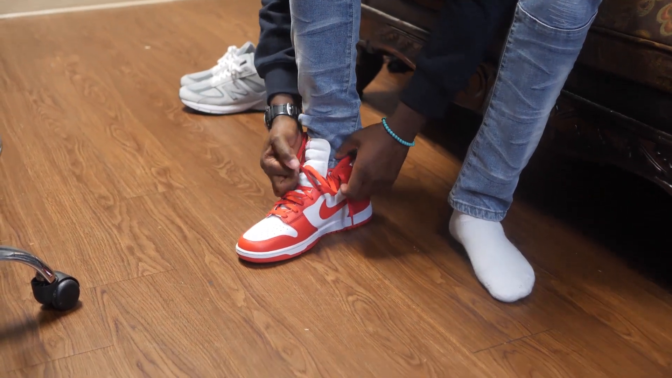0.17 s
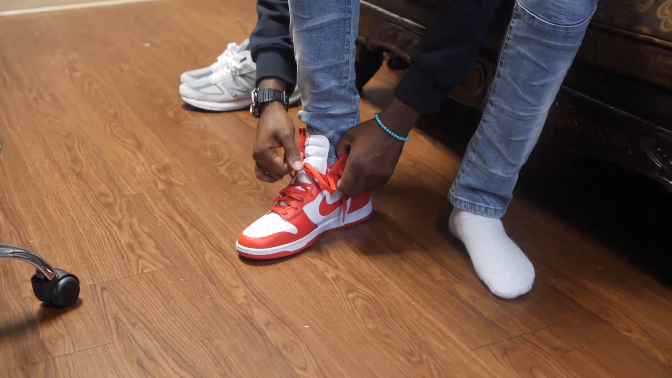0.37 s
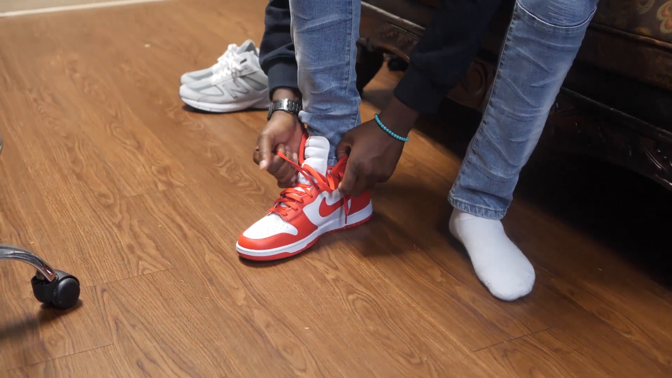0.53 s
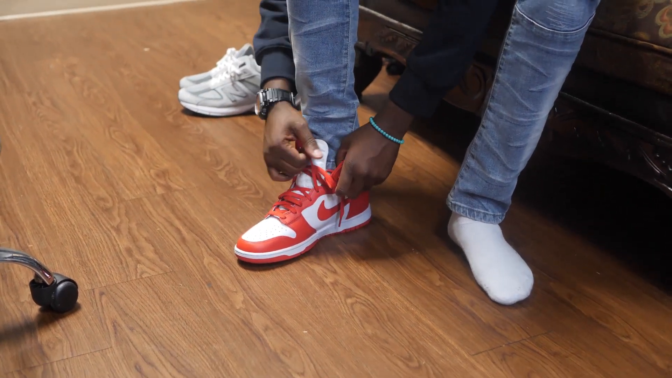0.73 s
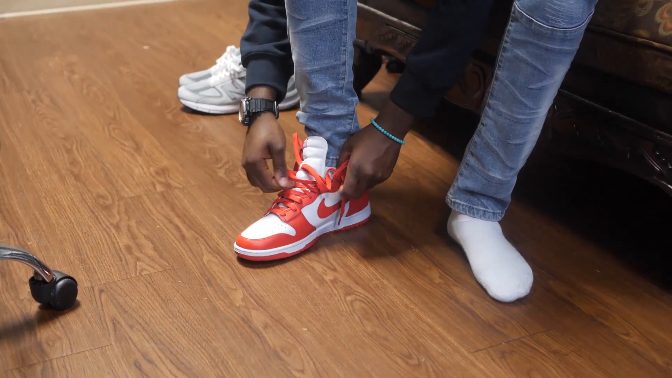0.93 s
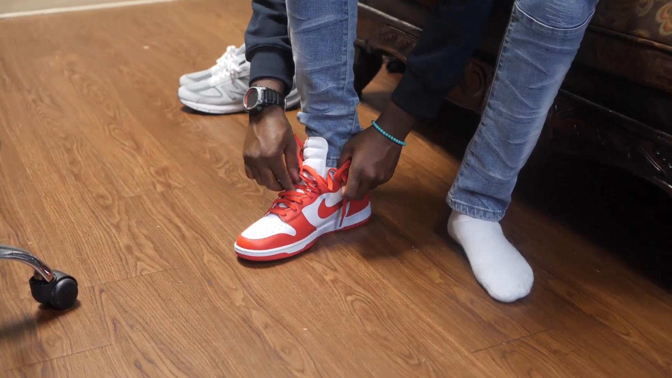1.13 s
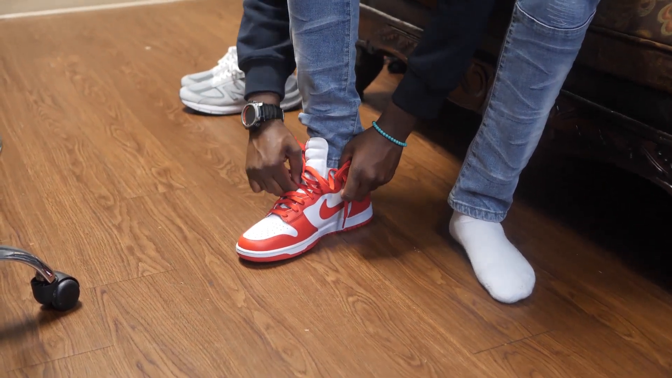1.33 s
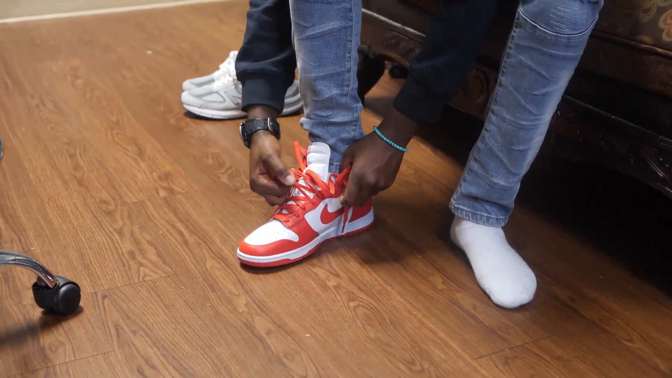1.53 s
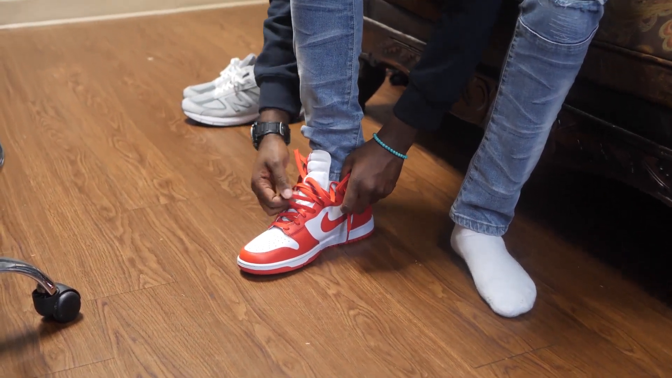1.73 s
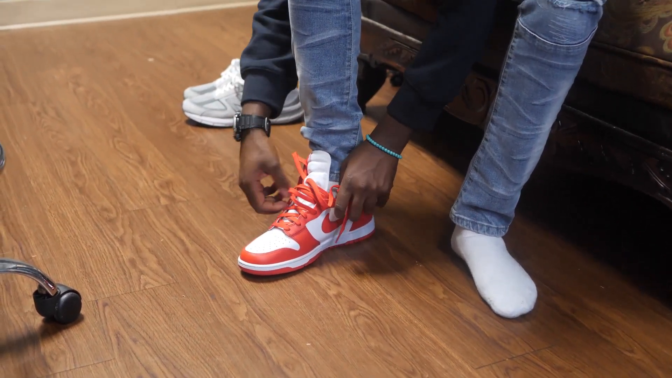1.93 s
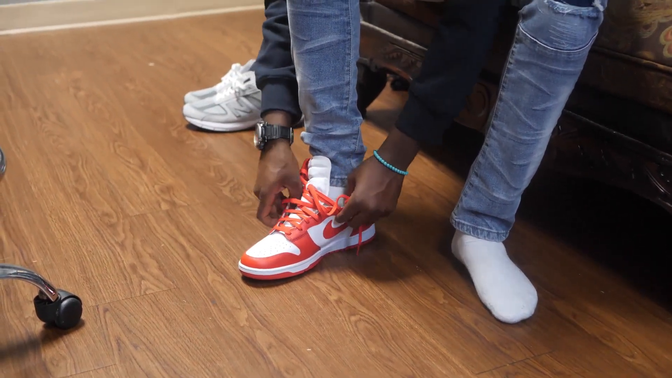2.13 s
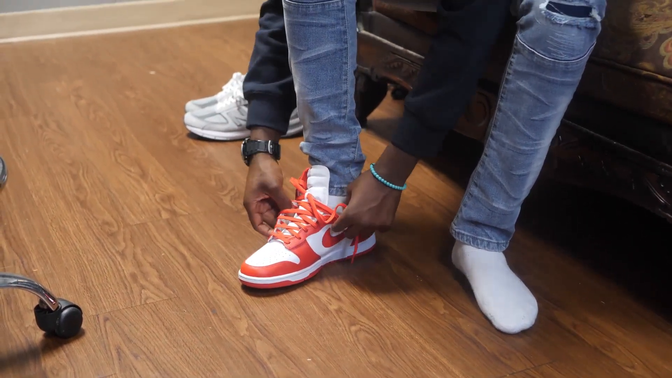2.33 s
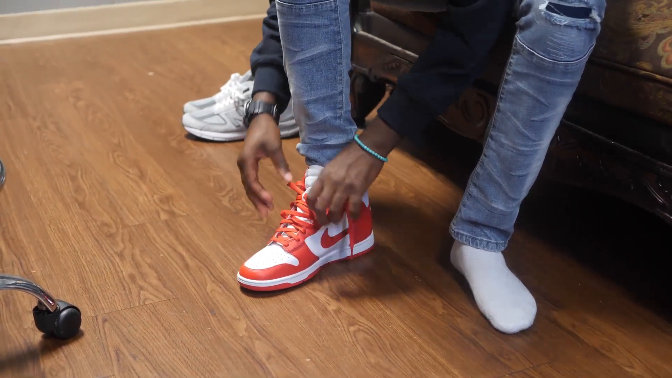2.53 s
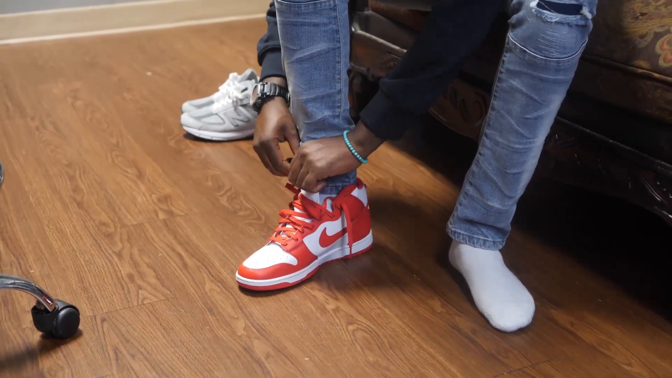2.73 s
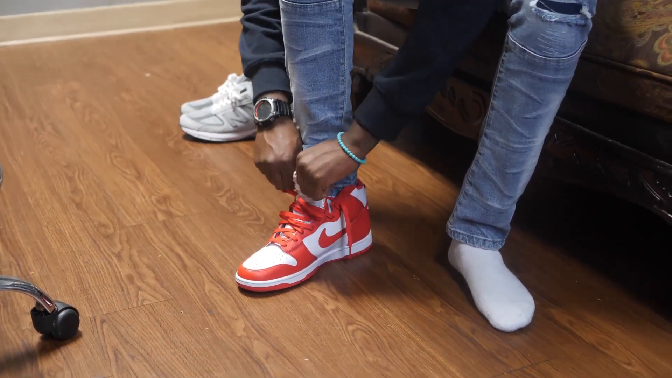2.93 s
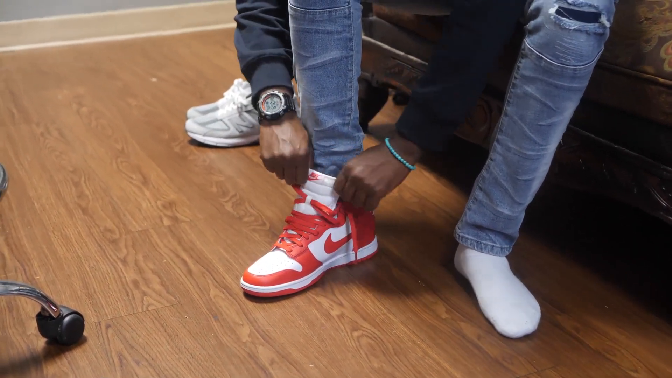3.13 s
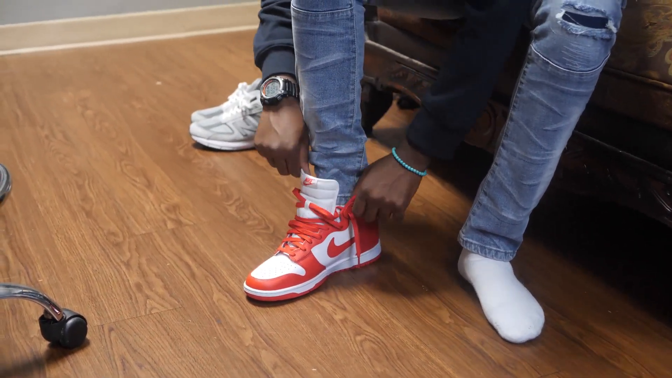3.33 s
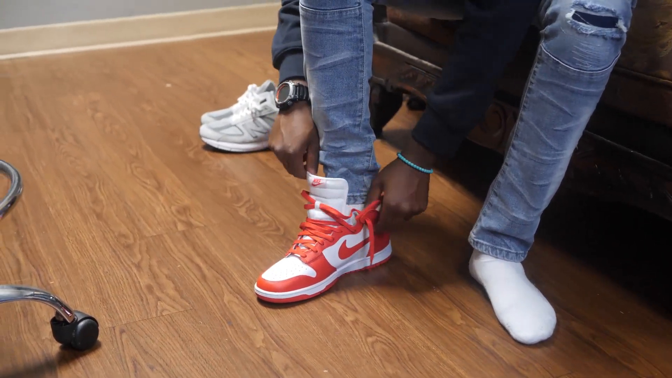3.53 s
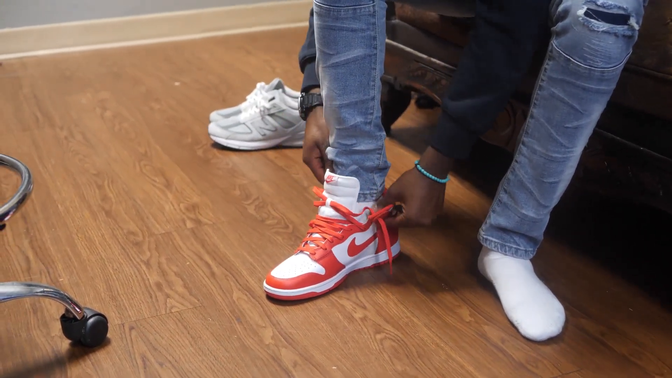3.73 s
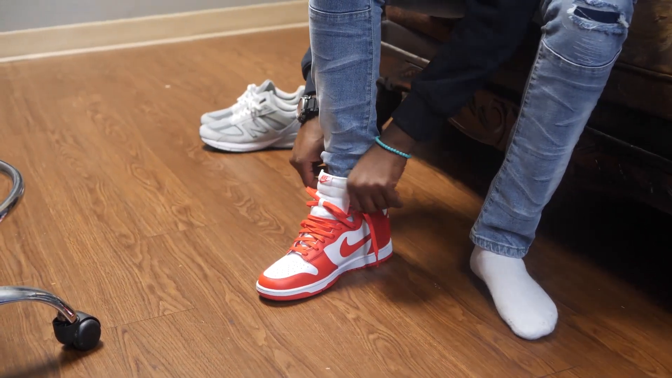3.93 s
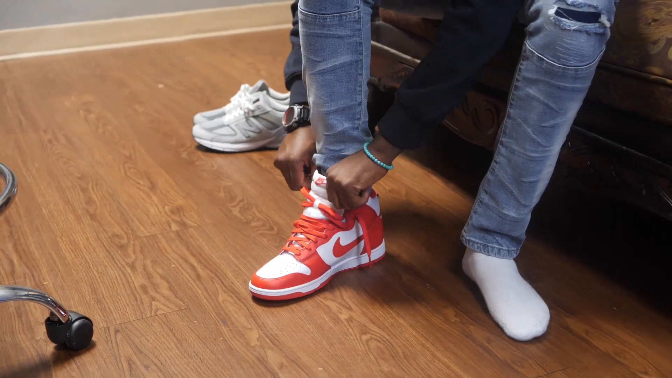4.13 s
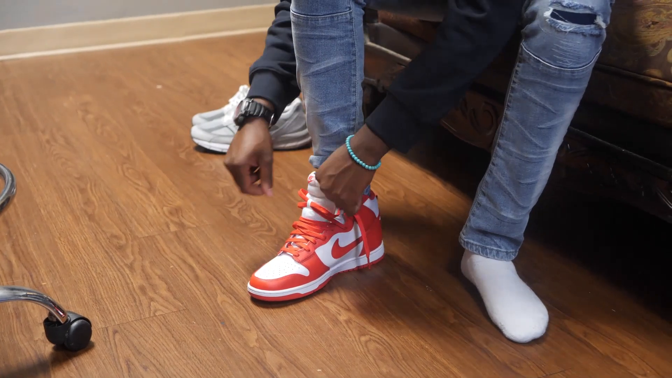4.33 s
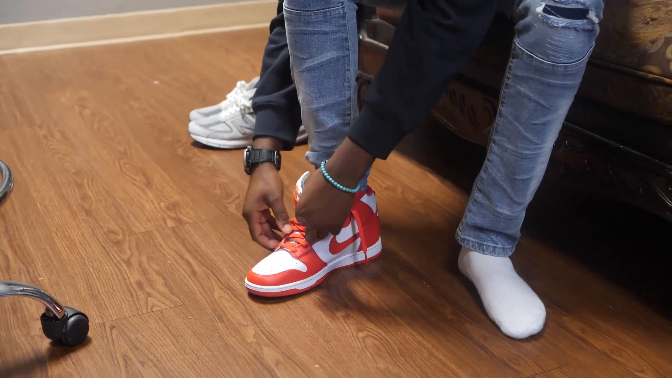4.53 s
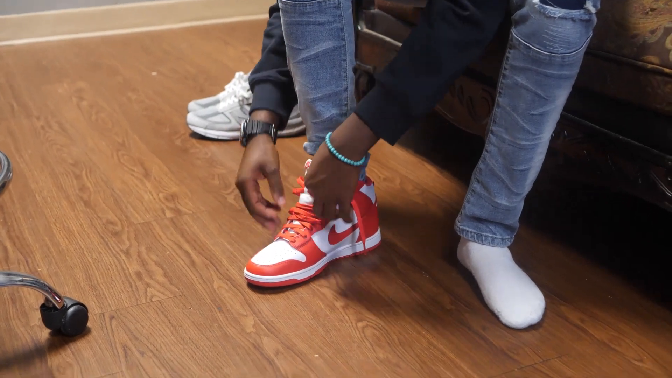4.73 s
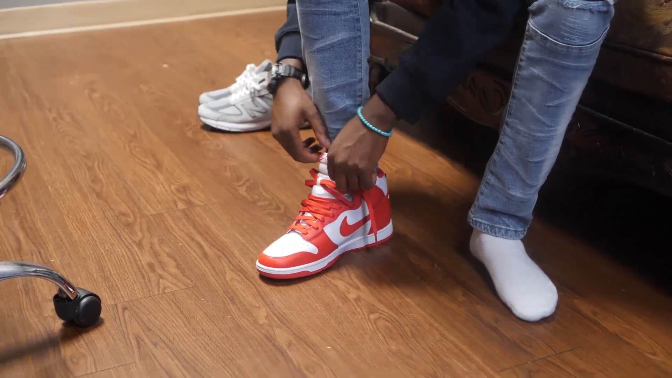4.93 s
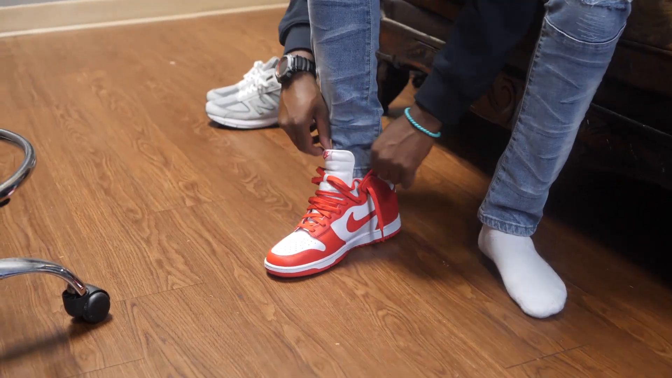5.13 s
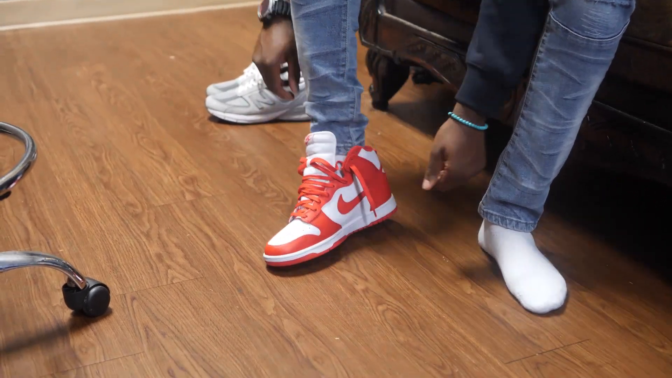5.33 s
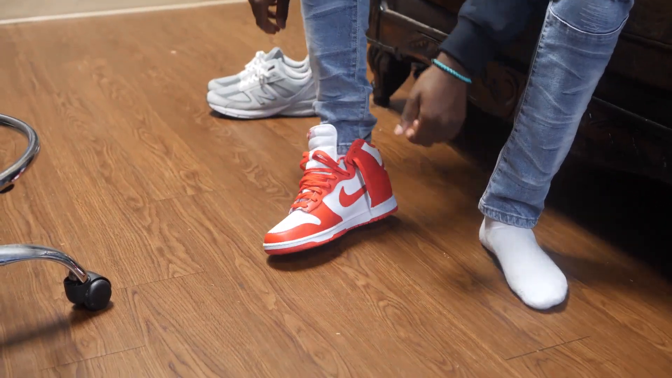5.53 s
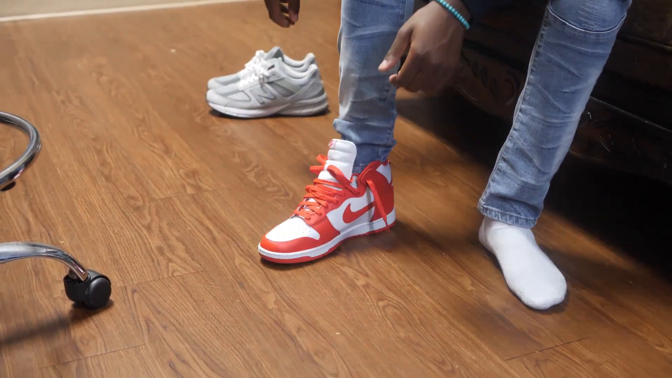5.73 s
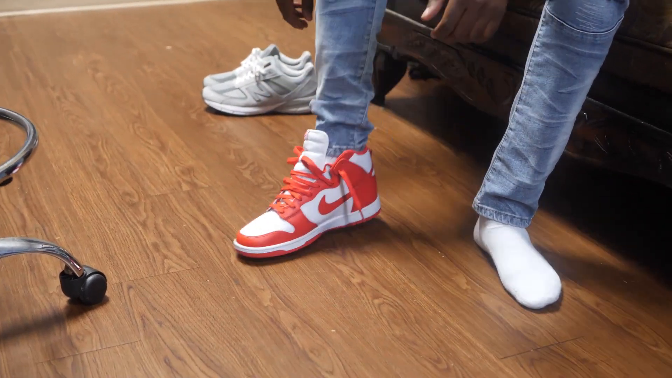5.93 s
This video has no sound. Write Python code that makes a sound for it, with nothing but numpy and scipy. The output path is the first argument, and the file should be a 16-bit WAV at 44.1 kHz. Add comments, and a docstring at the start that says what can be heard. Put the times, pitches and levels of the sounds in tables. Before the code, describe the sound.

Close, quiet lace pulling with dry rubbing and tiny leather taps, softer brushing, and finally two sharp sole knocks on floorboards.

```python
"""Shoe laces are pulled tight and tied in a small quiet room: random fibre slips rasp, hiss and shake the shoe.
A low resonance creaks as the lace tightens. Softer brushes follow, of fingers on knot, tongue and denim.
Fingers and lace ends tap the leather: short dead swings with a bright snap of noise.
Near the end, heel and sole knock twice on a wooden floor: thuds, clacks and grit set board tones ringing.
Faint room air and a low drone, both made of filtered noise, lie underneath."""
import sys
import numpy as np
from scipy import signal
from scipy.fft import rfft, irfft
from scipy.io import wavfile

SR = 44100
rng = np.random.default_rng(int(sys.argv[2]) if len(sys.argv) > 2 else 0)


def file_out(sig):
    """Save sig as 16-bit WAV at sys.argv[1]."""
    # one column per channel
    cols = np.atleast_2d(sig).T
    # limit, then scale
    lim = np.clip(cols, -1, 1)
    pcm = np.round(lim * 32767).astype(np.int16)
    wavfile.write(sys.argv[1], SR, pcm)


N = 268128
TIME = np.arange(N) / SR


def from_db(db):
    """Turn decibels into a gain."""
    return 10 ** (np.asarray(db) / 20)


def rms_one(x):
    """Scale a sound to an average (rms) level of 1."""
    return x / np.sqrt(np.mean(x ** 2) + 1e-20)


def fade(t, t60):
    """Natural dying away: the level falls by 60 dB over each t60."""
    return np.exp(-np.log(1000) * t / t60)


def at_hz(points, hz):
    """Read a table between its points, with pitch on a logarithmic axis."""
    table_hz, value = np.transpose(points)
    return np.interp(np.log(np.maximum(hz, 1)), np.log(table_hz), value)


def coloured(x, spectrum):
    """Strengthen or weaken each pitch by the level in a (pitch_hz, level_db) table."""
    size = x.shape[-1]
    gain = from_db(at_hz(spectrum, np.fft.rfftfreq(size, 1 / SR)))
    return irfft(rfft(x) * gain, size)


def cut(x, hz, kind, order=2):
    """Keep the lows, the highs or a band, filtering forward in time only."""
    edge_hz = np.clip(hz, 10, .45 * SR)
    return signal.sosfilt(signal.butter(order, edge_hz, kind, fs=SR, output="sos"), x)


def spread(mid, side):
    """Two close microphones hear a shared sound plus a side sound of opposite sign, weakest in the bass."""
    # how strong the side sound is: pitch_hz [Hz], side_minus_mid_db [dB]
    stereo_width = [(60, -26), (125, -51), (250, -30.5), (500, -18.5), (1000, -8), (4000, -7.5),
                    (8000, -24), (13000, -7.5)]
    return mid + coloured(side, stereo_width) * np.array([[1], [-1]])


def drift(rate_hz):
    """Random wavering slower than the given rate, with spread 1."""
    noise = rng.standard_normal(N + SR)
    return rms_one(cut(noise, rate_hz, "low")[SR:])  # the first second lets the filter settle


def ring(x, hz, t60):
    """Each unit click sets a sine of about height 1 ringing and dying away."""
    r = from_db(-60 / (t60 * SR))  # loss per sample
    turn = 2 * np.pi * hz / SR
    return signal.lfilter([0, np.sin(turn)], [1, -2 * r * np.cos(turn), r * r], x + 1e-18)


def resonate(x, hz, width_hz):
    """A resonance picks out one pitch, with a gain of about 1 at its peak."""
    r = np.exp(-np.pi * width_hz / SR)
    top = np.array([1, 0, -1]) * (1 - r * r) / 2
    return signal.lfilter(top, [1, -2 * r * np.cos(2 * np.pi * hz / SR), r * r], x)


def blow(hz, cycles, rise_cycles=0.46):
    """A yielding contact: a swing of height 1 that builds quickly and is gone after a few cycles."""
    turns = hz * TIME[:SR // 3]
    build = 1 - np.exp(-turns / rise_cycles)
    swing = -np.sin(2 * np.pi * turns) * fade(turns, cycles) * build
    return swing / np.abs(swing).max()


def crack(t60):
    """A burst of dying noise: grit at a contact."""
    t = TIME[:SR // 3]
    return rng.standard_normal(len(t)) * fade(t, t60) / 2


def add(track, s, sound):
    """Mix a stereo sound in at a time in seconds."""
    start = round(s * SR)
    track[:, start:start + sound.shape[1]] += sound[:, :N - start]


def reflected(x):
    """Sofa, wall and ceiling each return one late copy, which combs the spectrum."""
    # first reflections: delay_s [s], level_db [dB]
    first_echoes = [(.0029, -39), (.0052, -22.5), (.0120, -8.5)]
    t = TIME[:len(x)]
    return x + sum(from_db(db) * np.interp(t - delay, t, x, left=0) for delay, db in first_echoes)


def room(x, wet_db, build_s=0.00069):
    """A short sound, its first reflections and dense random echoes that die at a different rate in each band."""
    # how long the echoes last: pitch_hz [Hz], t60_s [s]
    echo_times = [(100, 0.27), (260, 0.1951), (700, 0.17), (1840, 0.18), (4850, 0.23), (14000, 0.45)]
    # balance of the echoes before they are scaled: pitch_hz [Hz], level_db [dB]
    echo_colour = [(60, -28), (150, 3), (400, 2), (750, 4.5), (1300, 0.5), (2500, -5), (4500, 8.5),
                   (8000, -7.5), (15000, -6.5)]
    t = TIME[:len(x)]
    edges = np.geomspace(60, 16000, 9)
    white, tail = rng.standard_normal((2, 2, len(t))), 0
    for k, band in enumerate(zip(edges, edges[1:])):
        hz = np.sqrt(band[0] * band[1])
        dying = from_db(at_hz(echo_colour, hz)) * fade(t, at_hz(echo_times, hz))
        tail = tail + dying * cut(white[k % 2], band, "band")
    tail = spread(*tail) * (1 - np.exp(-t / build_s))
    tail /= np.sqrt(np.sum(tail ** 2) / 2)  # unit energy per channel on average
    echoes = signal.fftconvolve(x[None], tail, axes=1)[:, :len(x)]
    return reflected(x) + from_db(wet_db) * echoes


def swell(s, rise_s, fall_s, db):
    """Gain of a run of strokes: each speeds up and slows down, and overlapping ones add in power."""
    edge_loss_db, roundness = 9.5, 1.54  # loss at the end of rise or fall; top: 1 pointed, 2 bell-shaped
    coarse_time = TIME[::32]
    power = 1e-12
    for at, rise, fall, level in zip(s, rise_s, fall_s, db):
        away = np.maximum((at - coarse_time) / rise, (coarse_time - at) / fall)
        power = power + from_db(level - edge_loss_db * np.abs(away) ** roundness) ** 2
    return np.interp(TIME, coarse_time, np.sqrt(power))


def slips(per_s, size_db):
    """Fibres catch and let go at random: dense clicks of uneven size."""
    uneven = from_db(size_db * np.minimum(rng.exponential(1, (2, N)), 4))
    sizes = uneven * rng.standard_normal((2, N))
    mid, side = sizes * (rng.random((2, N)) < per_s / SR)
    return spread(reflected(mid), side)


def crinkles(per_s=130, cycles=35, low_hz=520, high_hz=2700, count=22):
    """Folds and strands snag at random, each snag ringing briefly at one of a set of pitches."""
    snags = rng.standard_normal(N) * (rng.random(N) < per_s / SR)
    dealt = rng.integers(0, count, N)  # which pitch each snag gets
    pitches = np.geomspace(low_hz, high_hz, count)
    return rms_one(sum(ring(snags * (dealt == k), hz, cycles / hz) for k, hz in enumerate(pitches)))


def rubbing(strokes, colour, modes, drag_trim_db, rasp_trim_db, hiss_trim_db,
            slips_per_s, size_db, judder_db, crinkle_db):
    """Slips shake the shoe, rasp on the weave and hiss; a stronger, faster stroke makes more of them."""
    # balance of the fibre hiss before it is scaled: pitch_hz [Hz], level_db [dB]
    hiss_colour = [(4500, -18), (6500, -12.5), (8000, -7.5), (9400, 1), (11000, -1.5), (12600, -2),
                   (14500, -9.5), (16000, -13)]
    s, rise, fall, level, drag_rel, rasp_rel = np.transpose(strokes)
    drag, rasp, hiss = (swell(s, rise, fall, level + rel) for rel in (drag_rel, rasp_rel, 0))
    speed = np.sqrt(np.maximum(hiss / from_db(level.mean()), .1))

    # dividing by sqrt(speed) evens out the loudness of denser slips
    even_slips = slips(slips_per_s * speed, size_db) / np.sqrt(speed)
    grains = rms_one(even_slips * from_db(judder_db * drift(51)))
    weave = grains + from_db(crinkle_db) * crinkles()
    resonances = sum(from_db(db) * resonate(weave, hz, width) for hz, width, db in modes)
    weave = coloured(weave + resonances, colour)

    shoe = rms_one(cut(cut(weave, 1507, "low", order=5), 157, "high", order=3))
    cord = rms_one(cut(weave, [1650, 5500], "band", order=4))
    fibres = rms_one(cut(coloured(grains, hiss_colour), 5200, "high", order=3))
    return (drag * from_db(drag_trim_db) * shoe + rasp * from_db(rasp_trim_db) * cord
            + hiss * from_db(hiss_trim_db) * fibres)


def background():
    """Faint room air is coloured noise; two resonances in a row turn noise into a low drone."""
    # balance of still air and microphone hiss before scaling: pitch_hz [Hz], level_db [dB per Hz]
    air_colour = [(15, -61), (25, -24), (97, -2.5), (130, 2.5), (195, 0.5), (293, 1.5), (354, -1.5),
                  (575, -3.5), (1100, -9), (1700, -9), (2000, -11.5), (5280, -18), (10700, -15),
                  (14400, -18), (16000, -30)]
    noise = spread(*rng.standard_normal((2, N)))
    air = from_db(-58) * rms_one(coloured(noise, air_colour))
    hum = resonate(resonate(rng.standard_normal(N), 115, 25), 115, 25)
    return air + from_db(-68) * rms_one(hum)


def steps():
    """The weight thuds into the boards, the rubber sole clacks flat on them and scuffs as it settles."""
    # heel and sole contacts, levels before echoes and filtering: start_s [s], thud_db [dB], thud_hz [Hz],
    # clack_db [dB], clack_hz [Hz], clack_cycles [cycles], grit_db [dB], grit_t60_s [s]
    contacts = [(5.7214, -9.5, 320, -15, 1440, 3.4, -10.5, 0.0097),
                (5.753, -11.5, 292, -14.5, 1860, 8.1, -34, .01),
                (5.763, -5, 734, -3.5, 2330, 5.5, -14.5, 0.055),
                (5.9527, -23.5, 408, -17, 1740, 4.8, -46, .012),
                (6.007, -8, 530, -9.5, 1980, 3.2, -12.5, 0.018),
                (6.0175, -11, 585, -2.5, 1170, 2.46, -42, .01)]
    # floorboard tones, levels relative to each other: pitch_hz [Hz], level_db [dB], t60_s [s]
    board_tones = [(182, 1, 0.15), (279, 0, 0.36), (323, 3, 0.15), (351, -2, 0.34), (434, -11, 0.27),
                   (491, 4, 0.073), (567, -18, 0.12), (698, 8, 0.25), (798, 9.5, 0.27), (900, 4, 0.24),
                   (2250, 16, 0.073), (2600, -1, 0.16)]
    out = np.zeros((2, N))
    for s, thud_db, thud_hz, clack_db, clack_hz, cycles, grit_db, grit_t60 in contacts:
        noise = crack(grit_t60)
        bright_grit = from_db(-13) * cut(noise, [7000, 12500], "band")
        grit = cut(noise, 1.86 * clack_hz, "low", order=4) + bright_grit
        thud = from_db(thud_db) * blow(thud_hz, cycles=1.92)
        clack = from_db(clack_db) * blow(clack_hz, cycles)
        contact = thud + clack + from_db(grit_db) * grit
        boards = 0
        for k, (hz, db, t60) in enumerate(board_tones):
            boards = boards + (-1) ** k * from_db(db) * ring(contact, hz, t60)  # signs alternate
        add(out, s, room(contact, wet_db=-1.5) + from_db(-60) * boards)
    return cut(out, 132, "high", order=5)


def taps():
    """Padded leather gives a dead pat; the lace adds a bright snap."""
    # lace and fingers on leather, levels before echoes and filtering:
    # start_s [s], level_db [dB], pitch_hz [Hz], snap_db [dB relative to the pat]
    pats = [(0.104, -34.5, 393, -9), (0.250, -36.5, 603, -8), (0.563, -36, 201, -5),
            (0.994, -38.5, 960, -5), (1.101, -48, 900, -2.5), (1.297, -40, 1140, -16),
            (1.667, -29, 590, -1.5), (1.6680, -32.5, 163, 5.5), (1.6700, -26.5, 900, -18),
            (2.168, -33, 784, -10), (2.217, -41, 181, -20), (2.289, -40, 650, -23), (3.192, -31, 770, -9),
            (3.417, -38.5, 640, -18), (3.870, -40, 830, -16), (4.5376, -37.5, 530, 0),
            (4.622, -36.5, 590, -16), (4.859, -43, 1870, -18), (4.890, -40, 1510, -18),
            (5.108, -28.5, 2030, -19)]
    out = np.zeros((2, N))
    for s, db, hz, snap_db in pats:
        snap = crack(t60=0.015)
        snap = snap - resonate(snap, hz=5350, width_hz=2600)  # hollow out the middle treble
        touch = blow(hz, cycles=4.95) + from_db(snap_db) * snap
        add(out, s, from_db(db) * room(touch, wet_db=-4.5))
    return cut(out, 217, "high", order=3)


def fingers():
    """Skin, lace loops and denim brush each other: fibre slips with no resonances of the taut upper."""
    # brushes on knot, tongue and denim, levels before the trims below: fastest_s [s], rise_s [s], fall_s [s],
    # hiss_db [dB], drag_db [dB relative to hiss], rasp_db [dB relative to hiss]
    brushes = [(2.680, 0.12, 0.14, -62.5, 2.5, 4), (2.810, 0.1, 0.099, -57, 0.5, -1.5),
               (2.925, 0.059, 0.091, -52.5, -1.5, 0.5), (3.060, 0.036, .04, -43.5, -2.5, -3),
               (3.140, 0.054, 0.093, -55, 4.5, -4), (3.265, 0.12, 0.097, -51.5, -2, -3),
               (3.450, 0.087, 0.14, -58.5, 0.5, -3), (3.580, 0.12, 0.058, -58, 2.5, 0),
               (3.710, 0.068, 0.039, -57, 0.5, -5.5), (3.840, 0.04, 0.044, -50.5, -9, -5.5),
               (3.970, 0.19, 0.19, -62.5, 0.5, 1), (4.135, 0.097, 0.052, -60, 0.5, 1.5),
               (4.245, 0.038, 0.058, -51, 1.5, -6.5), (4.338, 0.045, 0.023, -52.5, -4.5, -6),
               (4.460, 0.067, 0.24, -59.5, -4, -3), (4.553, 0.016, 0.035, -58.5, 12.5, 5),
               (4.640, 0.033, .055, -52.5, 5.5, -2.5), (4.785, 0.0071, 0.025, -57.5, -4, -1),
               (5.020, 0.085, 0.071, -51.5, 1.5, -1.5), (5.110, 0.023, 0.036, -50, 3.5, -3),
               (5.180, .05, 0.096, -57.5, 0.5, -2), (5.320, 0.13, 0.11, -61.5, 8, 4.5),
               (5.540, 0.11, 0.3, -59.5, 5.5, 2.5), (5.900, 0.032, 0.057, -57, -3, -1)]
    # balance of the handling sound before scaling: pitch_hz [Hz], level_db [dB per Hz]
    handling_colour = [(59, -27), (100, -2.5), (302, -5), (328, -7), (547, -3), (676, -1.5), (872, -4.5),
                       (1390, -5), (1720, -4.5), (3250, -13), (6020, -18), (9610, -16), (12900, -12),
                       (14700, -19), (16000, -29)]
    return rubbing(brushes, handling_colour, [], drag_trim_db=-0.35, rasp_trim_db=0.57, hiss_trim_db=-0.25,
                   slips_per_s=7000, size_db=-1.0, judder_db=0.76, crinkle_db=-18)


def creak(width_hz=70):
    """Stick and slip of the taut lace rings one low resonance whose pitch climbs as the lace tightens."""
    # creaks in the long pull: strongest_s [s], rise_s [s], fall_s [s], level_db [dB]
    catches = [(1.385, 0.019, 0.041, -43), (1.435, 0.039, .025, -44), (1.605, 0.042, 0.031, -57)]
    tighten_from_s, tighten_s = 1.35, .04
    slack_hz, taut_hz = 456, 644
    tension = 1 - np.exp(-np.maximum(TIME - tighten_from_s, 0) / tighten_s)
    hz = slack_hz + (taut_hz - slack_hz) * tension
    # slow complex noise, shifted up to the moving pitch
    sway = cut(rng.standard_normal(N) + 1j * rng.standard_normal(N), width_hz, "low")
    tone = np.real(sway * np.exp(2j * np.pi * np.cumsum(hz) / SR))
    return swell(*np.transpose(catches)) * rms_one(tone)


def laces():
    """Taut lace sliding through the eyelets makes the upper resonate."""
    # pulls through the eyelets, levels before the trims below: fastest_s [s], rise_s [s], fall_s [s],
    # hiss_db [dB], drag_db [dB relative to hiss], rasp_db [dB relative to hiss]
    pulls = [(0.020, 0.048, 0.026, -52.5, 0, -6), (0.110, 0.058, 0.081, -49.5, 2, -2),
             (0.250, .035, .05, -48, 1.5, -3), (0.340, 0.054, .13, -57.5, -3.5, -5.5),
             (0.520, 0.039, 0.036, -57.5, 7, -2), (0.572, 0.044, 0.038, -47, 4.5, -3),
             (0.720, 0.085, .12, -61, 5, -2), (0.940, 0.17, 0.13, -64, 5.5, -3),
             (1.108, 0.02, 0.029, -54, -7, -4.5), (1.218, 0.046, 0.044, -48.5, 4, 3.5),
             (1.308, 0.021, 0.04, -56.5, 11.5, 9.5), (1.405, 0.052, 0.11, -51, 0, -0.5),
             (1.500, 0.11, 0.083, -49.5, 2.5, -4.5), (1.600, 0.023, 0.051, -53, 7, -4.5),
             (1.674, 0.0099, 0.038, -54.5, 10.5, 3), (2.055, 0.067, 0.081, -59, 9, -0.5),
             (2.165, .065, .06, -48.5, 6.5, -3), (2.310, 0.081, .035, -60, 8, -0.5),
             (2.482, 0.039, 0.037, -55.5, 3, 0)]
    # balance of the pulling sound before scaling: pitch_hz [Hz], level_db [dB per Hz]
    pulling_colour = [(59, -46), (100, -64), (163, -14), (295, -11), (415, -10), (461, -5), (595, -2.5),
                      (836, -5), (1680, -9.5), (2040, -16.5), (3120, -20.5), (6560, -26), (9610, -15.5),
                      (14400, -23), (16000, -35)]
    # resonances of the laced upper, before colouring: pitch_hz [Hz], width_hz [Hz], level_db [dB]
    upper_modes = [(423, 32, 1), (970, 63, -12), (2564, 180, 2), (3094, 110, 8), (3710, 100, 7),
                   (4200, 43, 1), (7140, 57, -14)]
    return rubbing(pulls, pulling_colour, upper_modes, drag_trim_db=-1.4, rasp_trim_db=0.5, hiss_trim_db=-0.04,
                   slips_per_s=9000, size_db=1.5, judder_db=1.02, crinkle_db=-23.5)


def scene():
    """All sources together at the microphone pair."""
    return background() + steps() + taps() + fingers() + creak() + laces()


def record(dry):
    """The recorder cuts the deep bass below 45 Hz and, steeply, the top above 15800 Hz."""
    top_cut = signal.ellip(10, .1, 70, 15800, fs=SR, output="sos")
    return signal.sosfilt(top_cut, cut(dry, 45, "high"))


dry = scene()
out = record(dry)
file_out(out)
```